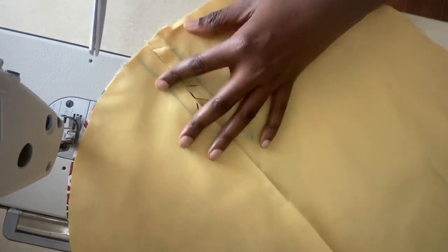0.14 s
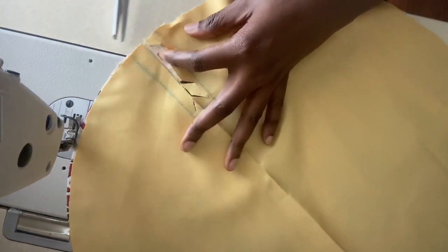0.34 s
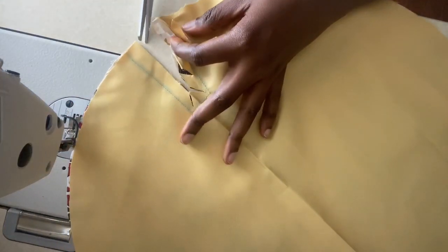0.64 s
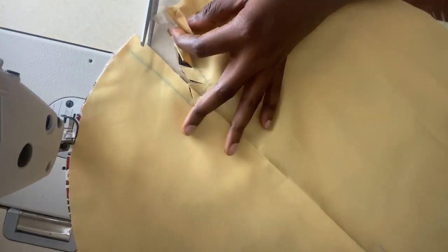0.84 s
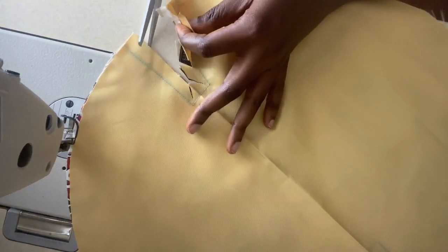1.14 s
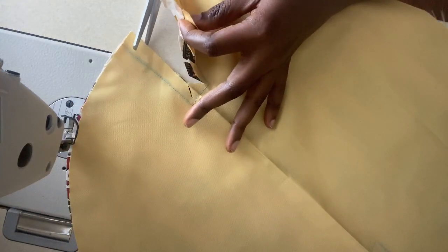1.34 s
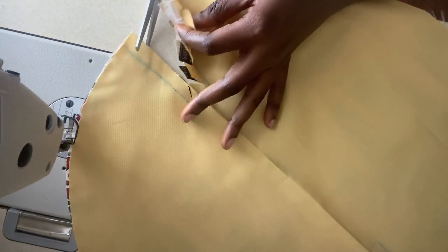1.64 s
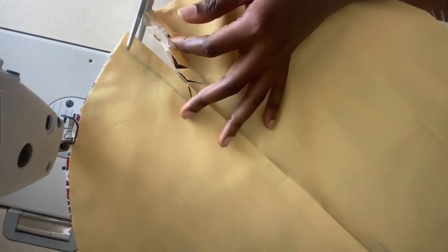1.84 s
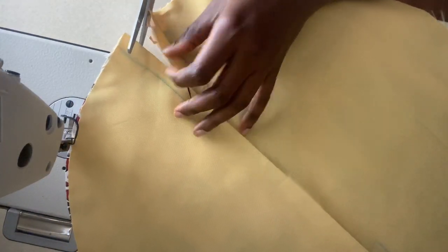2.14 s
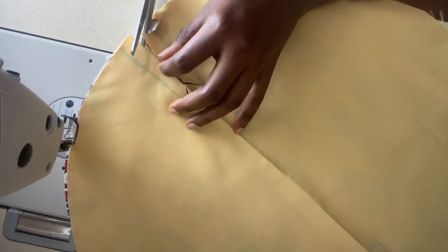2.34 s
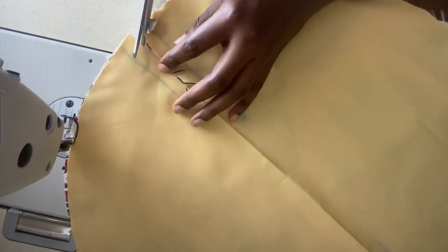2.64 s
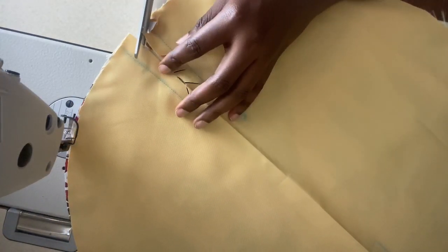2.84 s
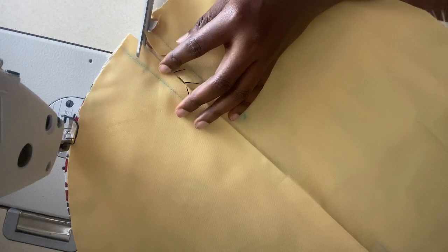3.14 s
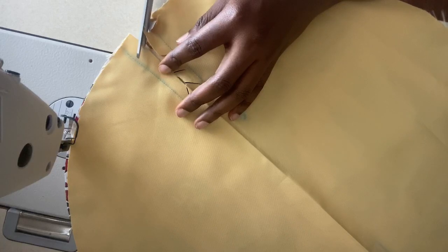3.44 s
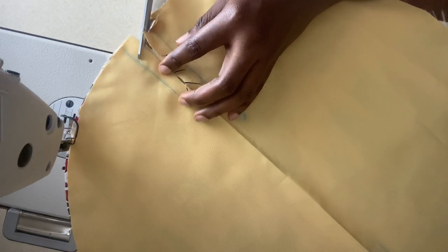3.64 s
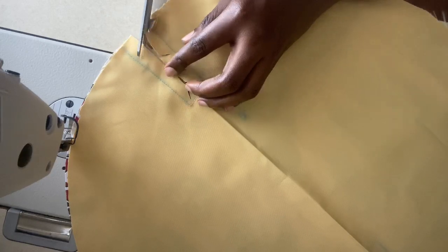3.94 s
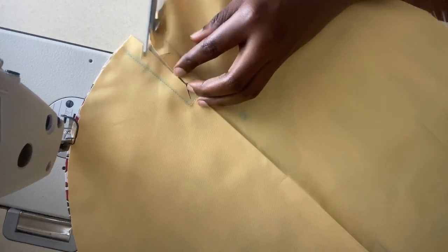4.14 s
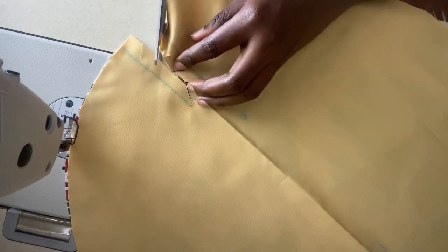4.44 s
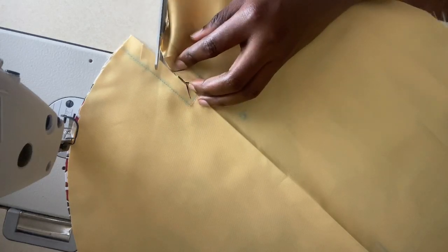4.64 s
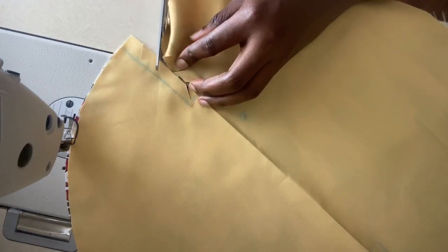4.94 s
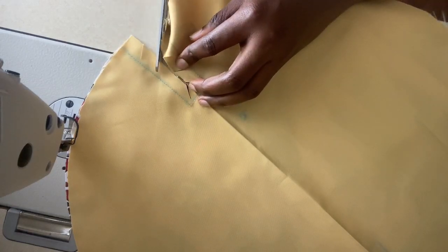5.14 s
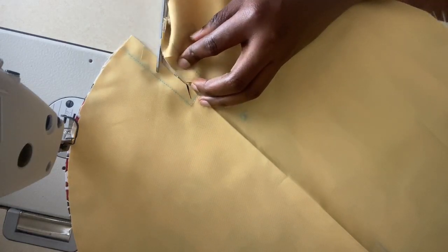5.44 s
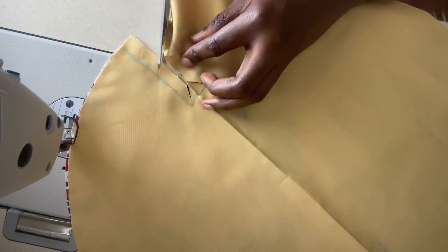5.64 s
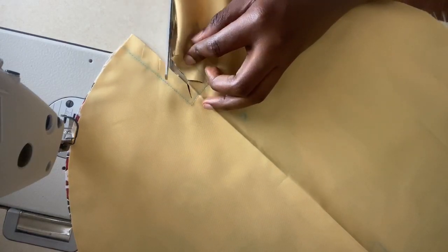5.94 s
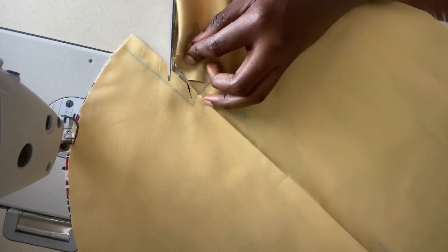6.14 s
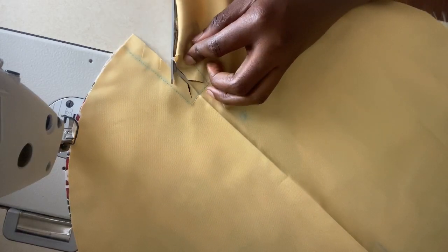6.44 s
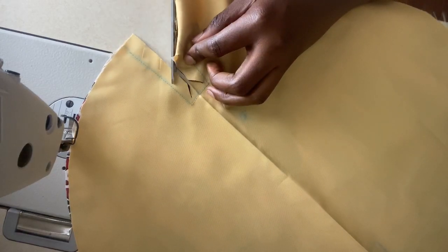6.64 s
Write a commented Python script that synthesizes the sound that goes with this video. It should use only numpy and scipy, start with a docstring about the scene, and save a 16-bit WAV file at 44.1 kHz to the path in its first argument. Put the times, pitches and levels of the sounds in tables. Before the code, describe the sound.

Scissors and fabric heard closely over faint low room air. First come a soft palm thump, brushing cloth, a tabletop knock and short rough scrapes with a slight squeak. The rustling thins out, then three brief snips come separately, each a quick run of crunching threads. The middle one leaves a faint steel ring; the last closes with the loudest snap. Short indoor echo.

```python
"""A quiet room with a sewing table, where tailor's scissors snip three notches into cloth.
Each cut is a run of bites: noise grains make the thread crunch, and a jolt rings the steel and the table.
Before and between the cuts a hand smooths the cloth (hissing noise) and the blade slides over the table
(rubbing noise with a rough squeak). Small knocks, ticks and a low murmur of room air complete the scene."""
import sys
import numpy as np
from scipy import signal
from scipy.fft import rfft, irfft, next_fast_len
from scipy.io import wavfile
from scipy.ndimage import uniform_filter1d, map_coordinates

SR = 44100
rng = np.random.default_rng(int(sys.argv[2]) if len(sys.argv) > 2 else 0)


def persist_wave(psi):
    """Save psi, clipped to +-1, as 16-bit WAV."""
    counts = np.round(np.clip(psi, -1, 1) * 32767).astype(np.int16)
    wavfile.write(sys.argv[1], SR, np.atleast_2d(counts).T)


N = 299202  # length of the scene [samples]
LEVEL_S = 0.01  # the level of a short sound is its energy spread over this time [s]
LEAD_S = 0.025  # time from the start of a surge to its peak [s]


def amp(db):
    """Turns decibels into gain."""
    return 10 ** (np.asarray(db) / 20)


def evened(x):
    """Scales a sound to rms 1."""
    return x / np.sqrt(np.mean(x ** 2) + 1e-20)


def steadied(x, window_s=0.042):
    """Evens out slow swells and keeps the grain, as under a steady pressure."""
    power = uniform_filter1d(x ** 2, round(window_s * SR))
    return x / np.sqrt(abs(power) + 1e-9)


def burst(x, db):
    """Gives a short sound the energy of LEVEL_S seconds at the level db."""
    energy = np.sum(x ** 2) + 1e-20
    return amp(db) * x * np.sqrt(LEVEL_S * SR / energy)


def add(mix, s, sound):
    """Mixes a sound in at time s [s], leaving out what falls outside the mix."""
    at = round(s * SR)
    sound = sound[max(-at, 0):]
    part = mix[max(at, 0):][:len(sound)]
    part += sound[:len(part)]


def read(points, hz):
    """Reads a curve of (frequency, value) points on a log-frequency axis."""
    f, value = np.transpose(points)
    return np.interp(np.log(hz + 1), np.log(f + 1), value)


def colour(x, points):
    """Filters a sound by a spectrum, then scales it to rms 1."""
    size = next_fast_len(len(x))
    gain = amp(read(points, np.fft.rfftfreq(size, 1 / SR)))
    return evened(irfft(rfft(x, size) * gain, size)[:len(x)])


def grains(size, spread_db, clump_s):
    """Noise of many tiny slips, whose strength changes from clump to clump."""
    t = np.arange(size) / SR
    noise, strength = rng.standard_normal((2, size))
    clumps = np.interp(t / clump_s, np.arange(size), strength)
    return evened(noise * amp(spread_db * clumps))


def mottle(x, patchy_db, patch_s, patch_hz):
    """Lets the colour wander in patches, as the spot that rubs keeps changing."""
    hz, t, z = signal.stft(x, SR, nperseg=256)
    field = rng.standard_normal((128, 1024))
    places = np.meshgrid(hz / patch_hz, t / patch_s, indexing="ij")
    patches = map_coordinates(field, places, order=1, mode="mirror")
    return evened(signal.istft(z * amp(patchy_db * patches), SR, nperseg=256)[1][:len(x)])


def resonate(x, hz, width):
    """Brings out a band around the curve hz, width [Hz] wide; rms 1."""
    turn = np.exp(2j * np.pi * np.cumsum(hz) / SR)
    r = np.exp(-np.pi * width / SR)
    shifted_down = x / turn
    smooth = signal.lfilter([1 - r], [1, -2 * r, r * r], shifted_down)
    return evened((turn * smooth).real)


def ring(drive, modes, tilt_db=0, spread=0):
    """A force rings decaying modes, tilted in dB per octave; they shift as the point of contact moves."""
    lowest = modes[0][0]
    out = np.zeros(len(drive))
    for hz, db, t60 in modes:
        r = np.exp(-np.log(1000) / (t60 * SR))
        turn = 2 * np.pi * hz * (1 + spread * rng.uniform(-1.31, 1)) / SR
        mode = evened(signal.lfilter([1], [1, -2 * r * np.cos(turn), r * r], drive))
        out += amp(db + tilt_db * np.log2(hz / lowest)) * mode
    # little radiates below the lowest mode
    return signal.sosfilt(signal.butter(3, 1.03 * lowest, "high", fs=SR, output="sos"), out)


def stroke(start, length, rise_s, sag_db, fade_s):
    """Gain of one rubbing movement: it takes hold, sags as it goes on, and dies away."""
    t = np.maximum(np.arange(N) / SR - start, 0)
    rise = np.minimum(t / rise_s, 1)
    sag = amp(sag_db * np.minimum(t / length, 1))
    fade = np.exp(-np.clip((t - length) / fade_s, 0, 20))
    return rise * sag * fade


def surge(build, fade):
    """Strength that builds up to a peak LEAD_S into the sound, then fades."""
    t = np.arange(SR // 3) / SR - LEAD_S
    return np.exp(-np.where(t < 0, -t / build, t / fade)) + 1e-9


# colour of the room noise: (frequency [Hz], relative level per Hz [dB])
AIR_COLOUR = [(25, -35), (38, -16), (52, -0.5), (80, 1.5), (110, -0.5), (170, -1), (280, -7.5), (500, -12),
              (1000, -18), (2000, -24.5), (4000, -27), (7500, -30.5), (9000, -35.5), (16000, -43.5)]


def air(db=-62.5):
    """The low murmur of room air: steady noise, strongest in the bass."""
    return amp(db) * colour(rng.standard_normal(N), AIR_COLOUR)


# how long the room's echo lasts: (frequency [Hz], time to fall by 60 dB [s])
ECHO_TIMES = [(100, 0.6), (500, 0.31), (1500, 0.35), (5000, 0.3), (15000, 0.2)]


def room(x):
    """Sparse reflections of random sign, the treble dying first."""
    size = SR // 2
    signs = rng.choice([-1., 1.], size)
    sparse = rng.random(size) < 3000 / SR  # about 3000 reflections per second
    late = np.arange(size) > 0.004 * SR
    hz, t, z = signal.stft(signs * sparse * late, SR, nperseg=256)
    decay = amp(-60 * t / read(ECHO_TIMES, hz)[:, None])
    tail = signal.istft(z * decay, SR, nperseg=256)[1]
    return signal.fftconvolve(x, tail / np.linalg.norm(tail))[:N]


# colour of the cloth under the hand: (frequency [Hz], relative level per Hz [dB])
CLOTH_COLOUR = [(200, 1), (700, -2.5), (1500, 0), (2500, 0), (4000, 0.5), (5200, -2), (7500, -1),
                (8800, -6), (12000, -10.5), (16000, -10)]
# the hand smooths or shifts the cloth: (start [s], length [s], level before rise and sag [dB])
WIPES = [ (0.0, 0.016, -49), (0.097, 0.061, -58), (0.188, .13, -60.5), (0.332, 0.27, -64),
         (0.65, 0.23, -62), (0.873, 0.1, -63.5), (1.025, 0.067, -63), (1.19, 0.18, -71), (1.486, 0.34, -72),
         (1.767, 0.066, -68.5), (1.864, .08, -70.5), (1.941, 0.17, -65.5), (2.124, 0.26, -68.5),
         (2.405, 0.22, -68), (2.64, 0.076, -75), (3.66, 0.4, -70.5), (4.088, 0.27, -68), (4.382, 0.29, -70),
         (4.79, 0.17, -74), (5.355, 0.1, -70), (5.47, 0.1, -65.5), (5.66, 0.16, -70.5),
         (5.789, 0.11, -63.5), (6.094, .17, -69.5)]
WIPE_RISE_S, WIPE_SAG_DB, WIPE_FADE_S = 0.048, -2.5, 0.041  # shape of a wipe


def wipes():
    """The weave hisses under the hand: patchy noise grains, shaped into strokes."""
    weave = mottle(grains(size=N, spread_db=1.5, clump_s=0.013), patchy_db=1.5, patch_s=0.05, patch_hz=663)
    strength = np.zeros(N)
    for start, length, db in WIPES:
        strength += amp(db) * stroke(start, length, WIPE_RISE_S, WIPE_SAG_DB, WIPE_FADE_S)
    return colour(weave, CLOTH_COLOUR) * strength


# the blades pushing through the cloth: (time [s], level [dB])
DRAG_LEVELS = [(6.54, -67), (6.6, -53), (6.65, -68), (6.695, -50), (6.73, -50.5), (6.76, -39), (6.785, -47)]


def drag():
    """The weave rasps against the blades, lower than under the hand."""
    # (frequency [Hz], relative level per Hz [dB])
    rasp = [(100, -11), (300, 12), (520, -13), (720, 16.5), (950, -2), (1600, -6), (2200, -14),
            (3000, -31), (4600, -8), (8000, -25), (16000, -43)]
    # silent before the first point
    level_db = np.interp(np.arange(N) / SR, *np.transpose(DRAG_LEVELS), left=-np.inf)
    return colour(grains(size=N, spread_db=2, clump_s=0.00083), rasp) * amp(level_db)


# colour of the table under a sliding blade: (frequency [Hz], relative level per Hz [dB])
SCRAPE_COLOUR = [(100, -34), (280, 6), (400, -2), (530, 8), (720, -7), (910, 7.5), (1050, -10.5),
                 (1250, -4), (1600, 0), (1850, -15), (3000, -19), (5000, -30), (7000, -38), (16000, -33)]
# the lower blade is pushed over the table: (start [s], length [s], level of rub and squeak before rise
# and sag [dB], squeak frequency [Hz], squeak over rub [dB], steel hiss over rub and squeak [dB])
PUSHES = [ (0.578, .185, -55.5, 1025, -5.5, -18.5), (0.856, 0.03, -60.5, 1100, 0, -16),
          (0.901, 0.087, -53, 1300, 4, -20), (1.035, 0.1, -54.5, 1290, -7, -11.5),
          (1.21, 0.11, -58.5, 1430, -1, -12), (1.342, 0.037, -52.5, 960, -2.5, -18.5),
          (5.525, 0.025, -49.5, 910, -5, -27), (5.598, 0.023, -62.5, 1000, -13, -13),
          (5.696, 0.094, -58, 495, -6, -20), (5.825, .08, -65, 1580, -2, -6),
          (5.962, 0.075, -60.5, 1080, 5, -21), (6.033, 0.016, -56.5, 1100, -2, -9),
          (6.175, 0.059, -57, 1460, -3, -18), (6.235, 0.069, -55.5, 1470, -5, -29)]
PUSH_RISE_S, PUSH_SAG_DB, PUSH_FADE_S = 0.025, -1.5, 0.033  # shape of a push


def slide(hiss_hz=6900, hiss_width_hz=3100, squeak_width_hz=220):
    """The blade sticks and slips over the table top, with a faint rough squeak and a thin steel hiss."""
    slips = mottle(grains(size=N, spread_db=2.0, clump_s=0.0026), patchy_db=8.0, patch_s=0.023, patch_hz=234)
    rub = steadied(colour(slips, SCRAPE_COLOUR))
    hiss = steadied(resonate(slips, np.full(N, hiss_hz), hiss_width_hz))
    friction = rng.standard_normal(N)
    out = np.zeros(N)
    for start, length, db, hz, squeak_db, hiss_db in PUSHES:
        squeak = amp(squeak_db) * steadied(resonate(friction, np.full(N, hz), squeak_width_hz))
        rub_and_squeak = (rub + squeak) / np.hypot(1, amp(squeak_db))  # keeps their joint level
        sound = rub_and_squeak + amp(hiss_db) * hiss
        out += amp(db) * stroke(start, length, PUSH_RISE_S, PUSH_SAG_DB, PUSH_FADE_S) * sound
    return out


# small dry ticks and flicks of cloth and fingers: (time [s], level [dB], centre [Hz], fade [s])
TICKS = [(0.048, -52.5, 2030, 0.00099), (0.136, -69, 4000, .011), (1.293, -64.5, 4660, 0.01),
         (1.367, -62.5, 4160, 0.01), (1.581, -64.5, 1900, 0.0054), (1.605, -66.5, 3140, 0.0099),
         (1.667, -64, 1920, 0.013), (3.9, -55.5, 3760, 0.021), (4.383, -55, 1530, 0.0044),
         (5.532, -55.5, 3700, 0.017), (5.984, -67.5, 4670, .014), (6.041, -63.5, 4700, .016)]


def ticks(width=1.78):
    """Brief dull crackles that do not ring: fading noise in a band from centre / width to centre * width."""
    out = np.zeros(N)
    t = np.arange(SR // 6) / SR
    for s, db, hz, fade in TICKS:
        crackle = rng.standard_normal(len(t)) * np.exp(-t / fade)
        band = signal.butter(2, [hz / width, hz * width], "band", fs=SR, output="sos")
        add(out, s, burst(signal.sosfilt(band, crackle), db))
    return out


# modes of the whole table on its frame: (frequency before any random shift [Hz], relative level [dB],
# time to fall by 60 dB [s])
FRAME_MODES = [(114.3, 3, 0.12), (133, 6, 0.15), (264, 4.5, 0.089), (317, -4, 0.21), (601, 3, 0.039)]


def palm(s=0.046, db=-41, soft_db=-9):
    """The hand lands on the table: a soft push (tilt soft_db per octave) that mostly moves the lowest modes."""
    out = np.zeros(N)
    add(out, s, burst(ring(signal.unit_impulse(SR // 3), FRAME_MODES, soft_db), db))
    return out


# colour of parting threads: (frequency [Hz], relative level per Hz [dB])
CRUNCH_COLOUR = [(500, -22), (1500, -15), (3200, -5), (4400, -5), (5600, -9.5), (7500, -7.5), (8800, -10),
                 (11200, -7.5), (12300, -1.5), (14000, -20), (16000, 0.5)]
# the blades' own high ringing: (frequency before random shift [Hz], relative level [dB],
# time to fall by 60 dB [s])
EDGE_MODES = [(3870, 18, 0.0095), (4460, -37, 0.0041), (6400, 4, .01), (7760, 11.5, 0.079),
              (9360, -19, 0.019), (10400, 12.5, 0.008), (10870, 9.5, 0.01), (14300, 5, 0.0074)]


def crunch(swell, edge_db=-6):
    """Parting threads tear, and set the blades' edges ringing."""
    threads = grains(size=len(swell), spread_db=2.0, clump_s=0.0007)
    tearing = mottle(colour(threads, CRUNCH_COLOUR), patchy_db=7.5, patch_s=0.0091, patch_hz=652)
    ringing = ring(threads * swell, EDGE_MODES, spread=0.054)
    return evened(tearing * swell) + amp(edge_db) * evened(ringing)


# the blades part again and scrape along the cut edge: (time [s], level [dB])
OPENINGS = [(3.899, -58), (5.538, -56)]


def openings(rise_s=0.0072, fade_s=0.021):
    """The opening blades brush the threads: a soft crunch with no jolt."""
    out = np.zeros(N)
    for s, db in OPENINGS:
        add(out, s - LEAD_S, burst(crunch(surge(rise_s, fade_s)), db))
    return out


# modes of the steel blades pressed on the table: (frequency before random shift [Hz],
# relative level before brightness tilt [dB], time to fall by 60 dB [s])
STEEL_MODES = [(1436, -53, 0.54), (1474, -18.5, 0.03), (1577, 4, 0.03), (1952, -22.5, 0.097),
               (2193, -9, 0.023), (2670, -16.5, 0.037), (3183, -14.5, 0.017), (3800, -23, 0.009),
               (4370, -12.5, 0.0061), (6010, -17.5, 0.0026), (7700, -29, 0.014)]
# modes of the table board: (frequency before random shift [Hz], relative level [dB],
# time to fall by 60 dB [s])
BOARD_MODES = [(315, 7, 0.03), (400, -5, 0.1), (493, -8, 0.16), (558, 3.5, 0.051), (620, 7.5, 0.032),
               (726, -3, 0.12), (882, 6, 0.048), (900, -8.5, 0.032), (1106, -8, 0.29), (1184, 0, 0.17),
               (1304, -1, 0.047)]


def jolt(swell, steel_db, bright_db, board_db, thump_db, snap=0.77, board_lag_s=0.000994,
         thump_lag_s=0.00297):
    """A gritty force with a sudden jump at its peak shakes the steel, then the board, then the frame."""
    grit = grains(size=len(swell), spread_db=3.0, clump_s=0.00063) * swell
    jump = signal.unit_impulse(len(swell), round(LEAD_S * SR))
    force = grit / np.linalg.norm(grit) + snap * jump
    out = burst(ring(force, STEEL_MODES, bright_db, spread=0.004), steel_db)
    add(out, board_lag_s, burst(ring(force, BOARD_MODES, spread=0.0085), board_db))
    add(out, thump_lag_s, burst(ring(force, FRAME_MODES, spread=0.1), thump_db))
    return out


# the scissors knock on the table, as they are set down, nudged or snapped shut:
# (time [s], build-up [s], fade [s], steel level [dB], steel brightness [dB per octave],
# table board level [dB], low thump level [dB])
KNOCKS = [(0.048, 0.0023, 0.0017, -49.5, 1, -50, -46), (0.561, 0.00029, 0.0027, -48, 2.5, -38, -48),
          (1.061, .001, .008, -55.5, 3, -59, -70), (1.303, .01, 0.0055, -55, 1, -55, -63),
          (3.642, 0.0009, 0.0012, -53.5, 11, -54, -37.5), (5.3042, 0.00054, .0032, -43.5, -8, -36, -41),
          (6.2, 0.0007, 0.0032, -56.5, -12, -61, -70), (6.303, 0.013, 0.0042, -75, 0, -51.5, -67),
          (6.558, 0.0046, 0.0014, -45.5, -17, -67, -76), (6.577, 0.0019, 0.0036, -58, -9, -73, -50),
          (6.7404, 0.0024, 0.0027, -21, 1.5, -33.5, -41.5)]


def knocks():
    """Steel meets the table top: a jolt with no threads in it."""
    out = np.zeros(N)
    for s, build, fade, steel_db, bright_db, board_db, thump_db in KNOCKS:
        add(out, s - LEAD_S, jolt(surge(build, fade), steel_db, bright_db, board_db, thump_db))
    return out


def ringing_blade(s=5.256, db=-47, hz=1565, t60=0.52):
    """From a strong bite midway through the second cut, a blade rings on: a decaying sine."""
    t = np.maximum(np.arange(N) / SR - s, 0)
    return np.sqrt(2) * amp(db - 60 * t / t60) * np.sin(2 * np.pi * hz * t)


# the blades bite through a bunch of threads:
# (time [s], build-up [s], fade [s], thread crunch level [dB], jolt gain [dB])
BITES = [ (3.527, 0.0037, 0.0042, -55, -60), (3.550, .004, .0036, -45, -50.5),
         (3.570, 0.0067, 0.0051, -46, -45.5), (3.586, 0.00078, 0.0048, -41, -47.5),
         (3.5905, 0.0021, 0.0073, -38.5, -38.5), (3.639, 0.00067, 0.0052, -39, -54),
         (5.197, 0.0055, .003, -57.5, -56), (5.206, 0.0018, 0.0022, -59, -43),
         (5.226, 0.0047, 0.002, -50, -37.5), (5.237, 0.0027, 0.0025, -55, -55),
         (5.2505, 0.0041, 0.011, -52, -28), (5.256, 0.0032, 0.011, -39, -35),
         (5.268, 0.0033, 0.0065, -45, -36.5), (5.301, 0.0013, 0.0017, -42.5, -59),
         (6.558, 0.0039, 0.0034, -60, -74), (6.568, 0.0024, .004, -55, -49),
         (6.587, 0.0057, .0022, -55.5, -42), (6.617, 0.0011, 0.0045, -51, -40.5),
         (6.636, 0.0027, 0.003, -68, -51), (6.657, .002, 0.0035, -60, -57), (6.668, .001, .0037, -49, -60),
         (6.673, 0.0038, 0.0043, -45, -28.5), (6.733, 0.0012, 0.0043, -41, -34)]
# how the scissors lie in each cut, which decides what a jolt shakes; in the first the cloth cushions
# the steel: (from time [s], steel level before jolt gain [dB], steel brightness at a firm jolt
# [dB per octave], table board level before jolt gain [dB], low thump level before jolt gain [dB])
CUTS = [(3.5, -48, 10, -8.5, -2.5), (5.1, -1.5, -.5, -4.5, -15), (6.5, -3.5, 2, -3.5, -20)]
FIRM_DB = -30  # jolt gain of a firm bite [dB]
HARDER_BRIGHTER = 0.083  # added steel brightness [dB per octave] for each dB above firm; less below


def bites():
    """Threads crunch around each bite's peak and the blades jump; each cut passes the jolts on in its own way."""
    out = np.zeros(N)
    for s, build, fade, crunch_db, jolt_db in BITES:
        current_cut = [cut for cut in CUTS if cut[0] <= s][-1]
        _, steel_db, firm_bright_db, board_db, thump_db = current_cut
        bright_db = firm_bright_db + HARDER_BRIGHTER * (jolt_db - FIRM_DB)
        swell = surge(build, fade)
        shake = jolt(swell, steel_db, bright_db, board_db, thump_db)
        threads = burst(crunch(swell), crunch_db)
        add(out, s - LEAD_S, threads + amp(jolt_db) * shake)
    return out


def scene():
    """Scissors and cloth close by, over the low murmur of room air."""
    cuts = bites() + knocks() + openings() + ticks() + palm() + ringing_blade()
    echo = amp(-11.5) * room(cuts)
    rubbing = slide() + wipes() + drag()
    return (cuts + echo + rubbing + air())[None]


def record(dry, bass_hz=48, treble_hz=15900):
    """The microphone drops the deep bass below bass_hz; then a steep filter cuts the treble above treble_hz."""
    thin = signal.sosfilt(signal.butter(4, bass_hz, "high", fs=SR, output="sos"), dry)
    band_limit = signal.firwin(511, treble_hz, window=("kaiser", 9), fs=SR)
    return signal.oaconvolve(thin, band_limit[None], "same")


dry = scene()
out = record(dry)
persist_wave(out)
```